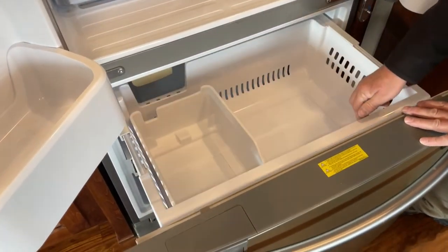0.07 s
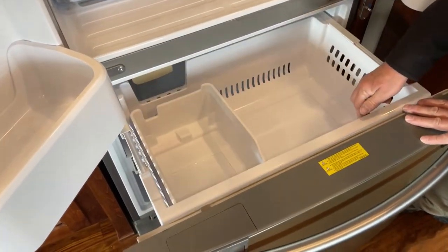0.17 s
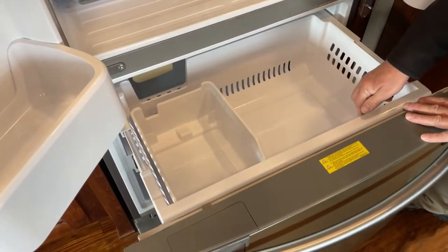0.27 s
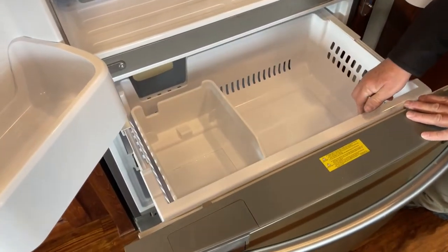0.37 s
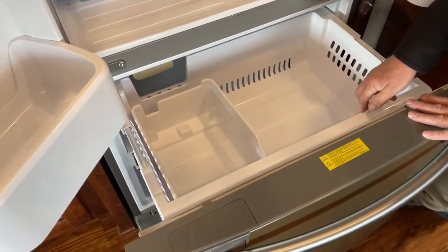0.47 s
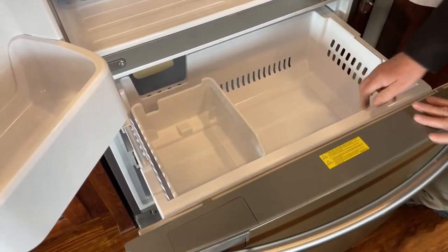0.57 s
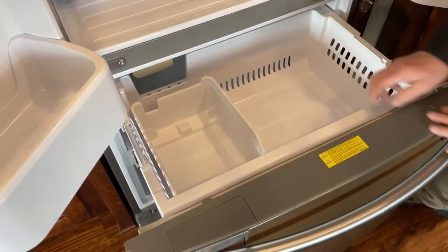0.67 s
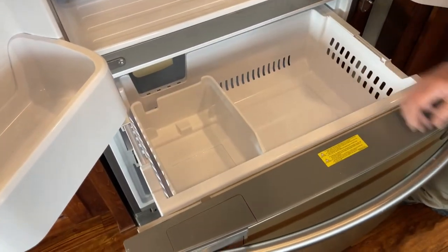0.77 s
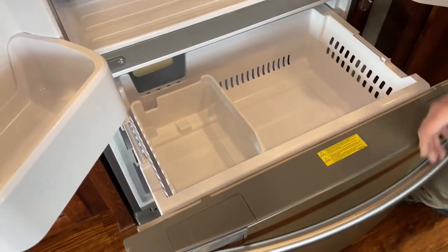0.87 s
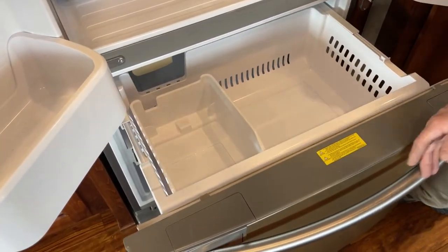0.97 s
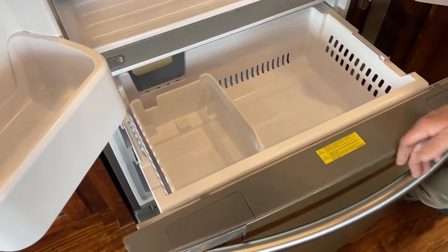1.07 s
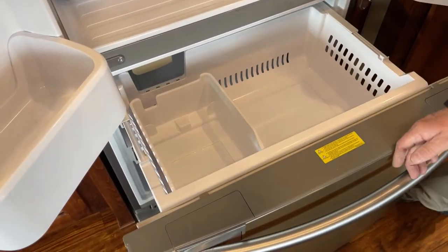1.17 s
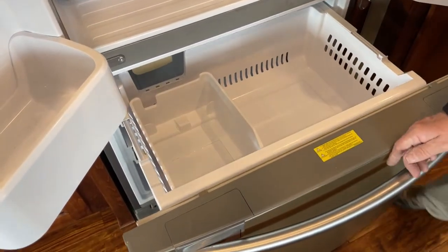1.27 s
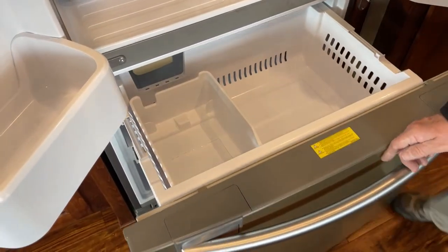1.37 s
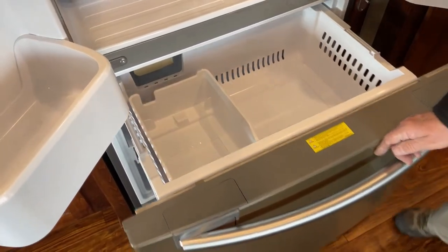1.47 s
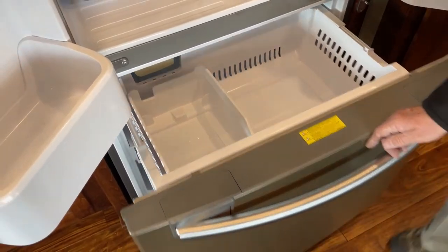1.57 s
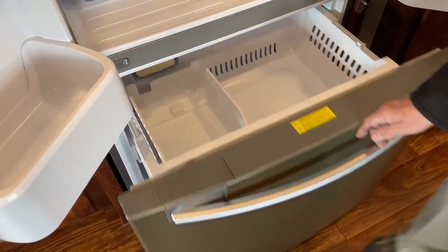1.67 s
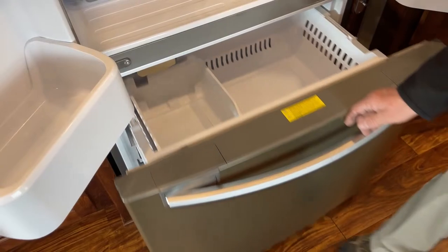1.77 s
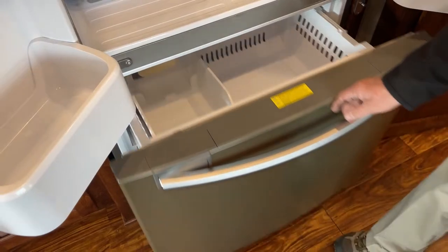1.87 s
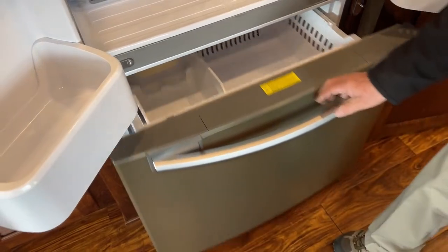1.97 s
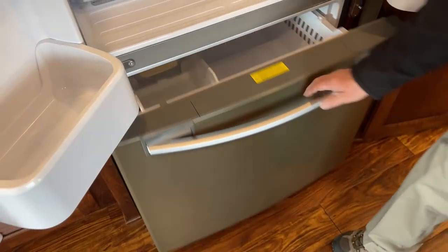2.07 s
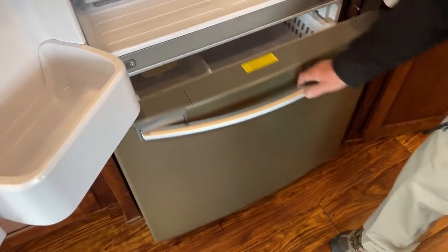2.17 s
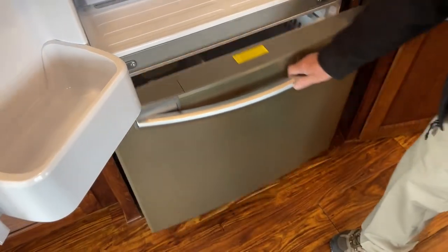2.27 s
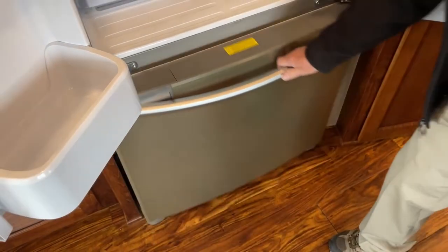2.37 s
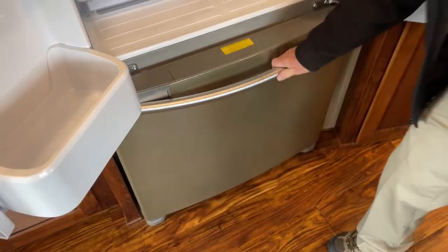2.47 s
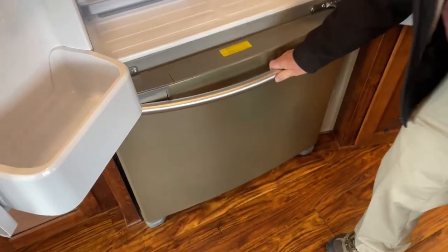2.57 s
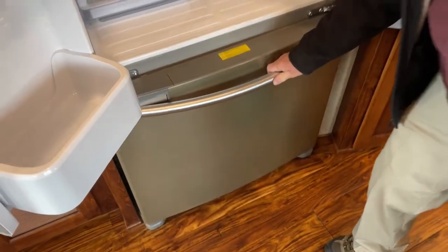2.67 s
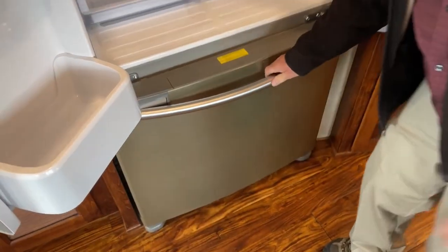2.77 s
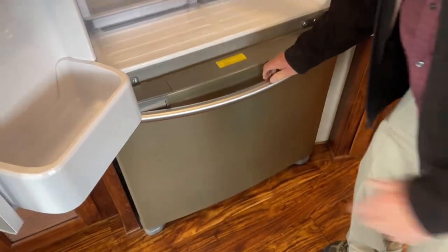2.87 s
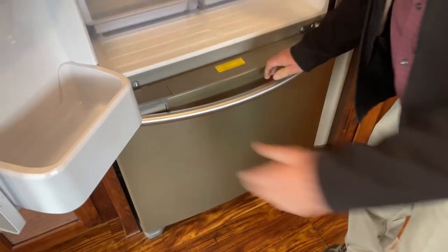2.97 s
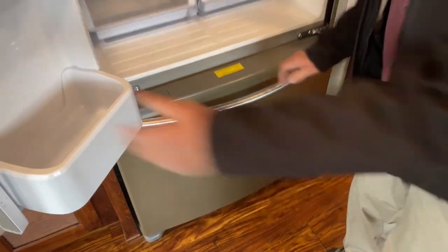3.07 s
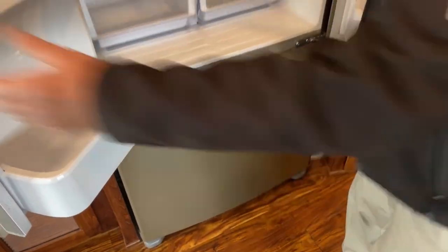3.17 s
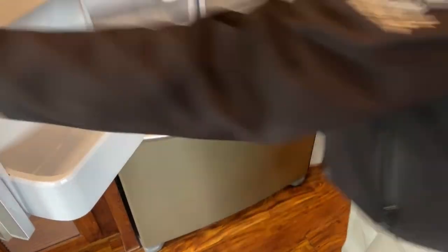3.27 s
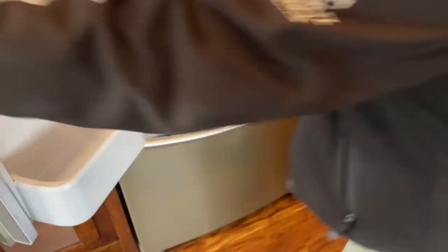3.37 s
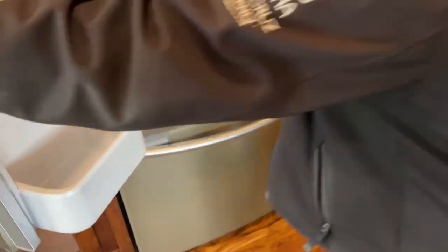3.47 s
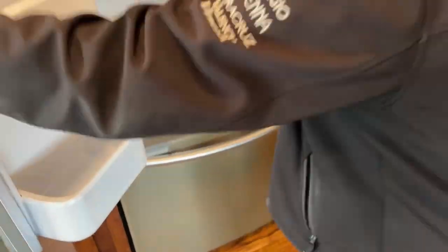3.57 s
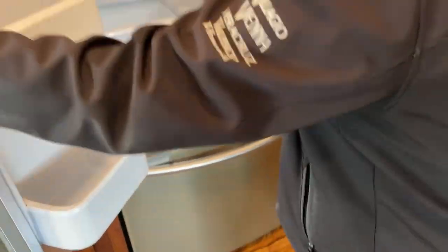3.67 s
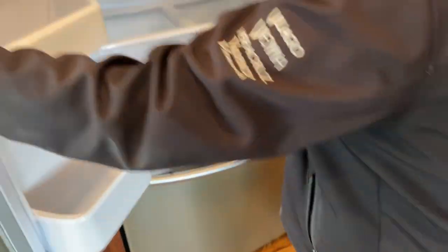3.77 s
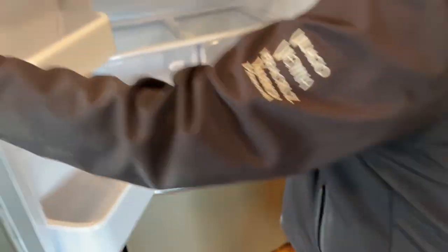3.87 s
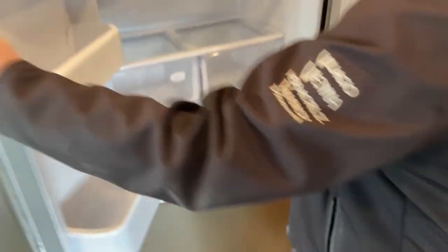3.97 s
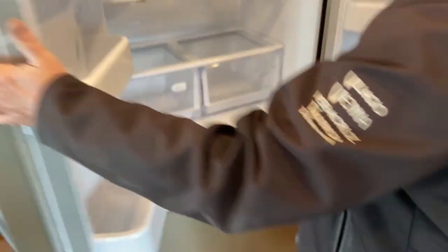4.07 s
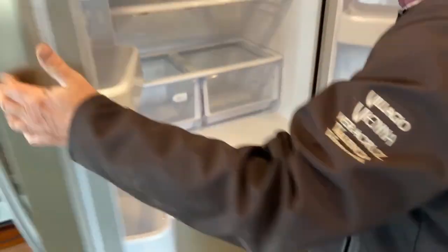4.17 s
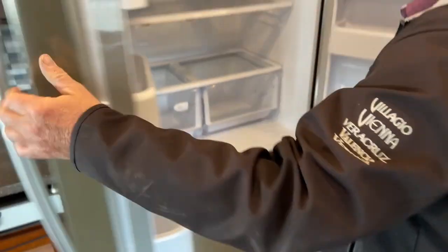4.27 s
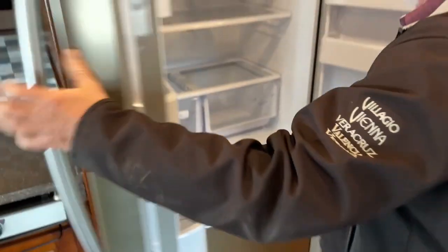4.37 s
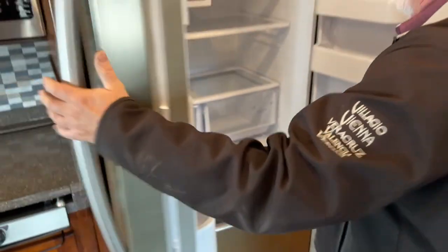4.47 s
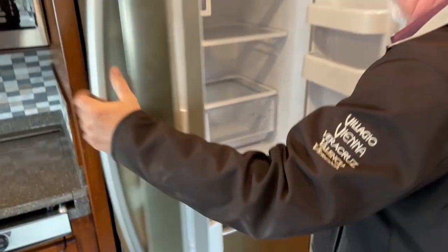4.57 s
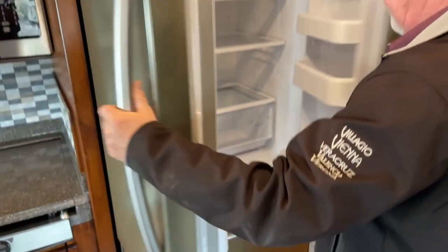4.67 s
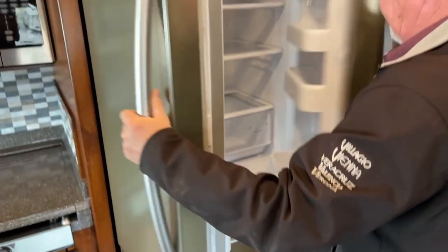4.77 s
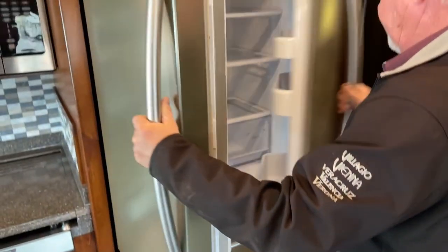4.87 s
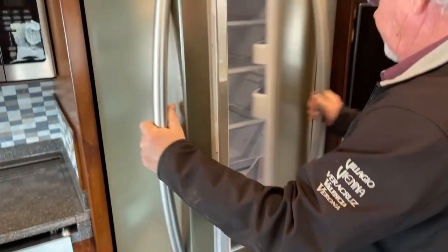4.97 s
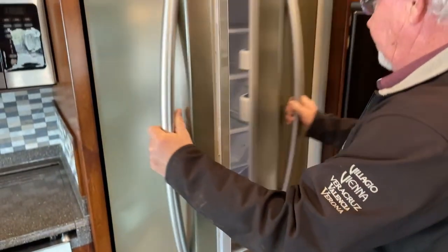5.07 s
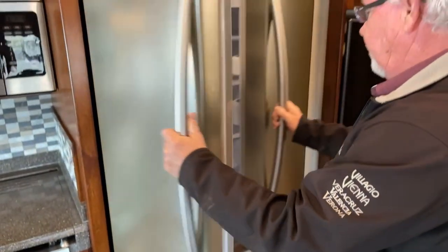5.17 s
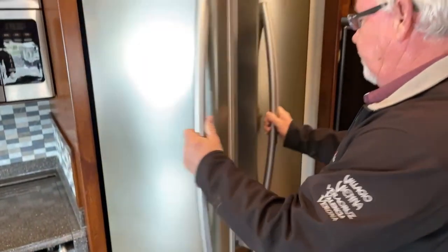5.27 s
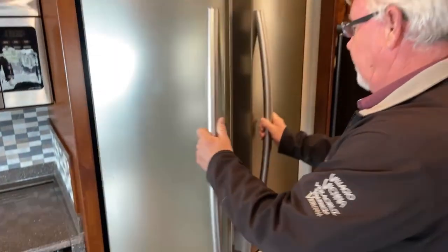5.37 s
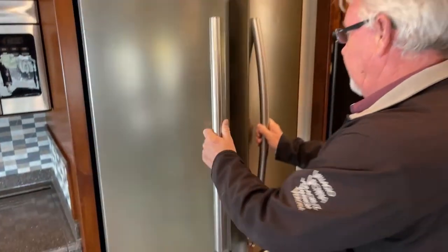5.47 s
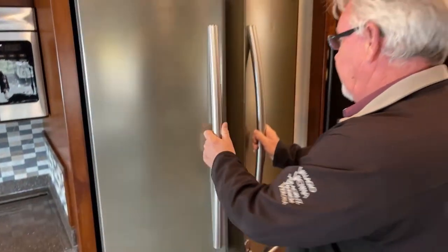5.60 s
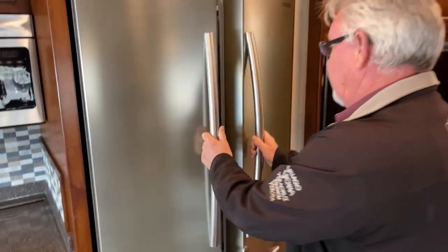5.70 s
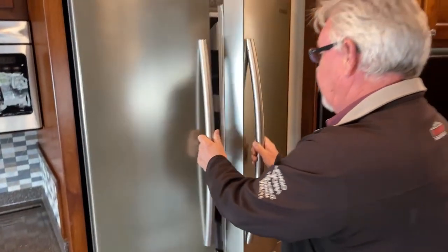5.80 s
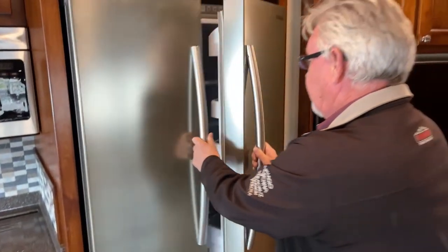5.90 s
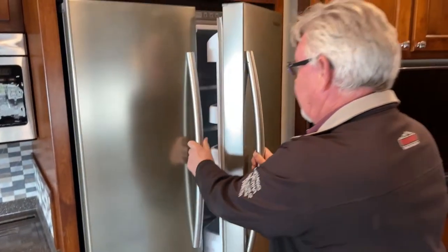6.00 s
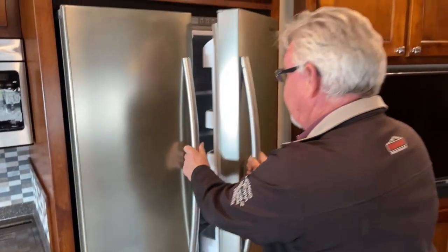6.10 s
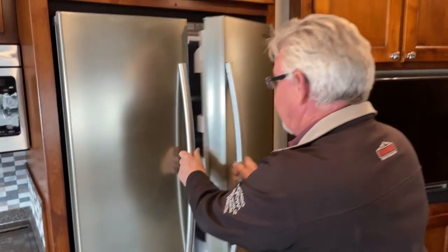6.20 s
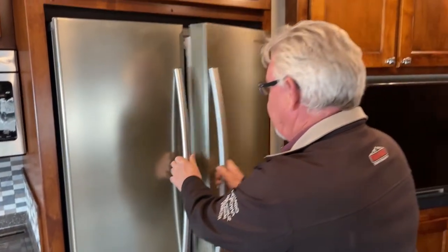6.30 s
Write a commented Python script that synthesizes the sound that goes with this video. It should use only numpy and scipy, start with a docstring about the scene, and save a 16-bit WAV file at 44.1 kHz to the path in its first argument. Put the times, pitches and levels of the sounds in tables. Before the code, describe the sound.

Inside a small, furnished cabin with a faint low drone, a hollow plastic knock rings off, then a freezer drawer scrapes along its rails and slams with two heavy, rattling thuds. A jacket sleeve swishes close by with tiny squeaks. Soft door thumps and handle clicks follow, ending with a double clack and deep thump of the refrigerator doors. Close microphone, short dull room.

```python
"""Refrigerator doors are swung and closed inside a motorhome, after a freezer drawer is rolled shut.
Blows ring the cabinet's panels as decaying modes and shake its trays and shelves as clumpy noise.
Seals and floor thump as sagging sines, hard parts snap and click, and the cabinet shudders on.
The drawer is noise through resonances of its box and rails; a sleeve sweeps past and squeaks.
Behind the close capsules' view lie a low drone, a changing hiss and murmur, and a short room."""
import sys
import numpy as np
from scipy import signal
from scipy.fft import rfft, irfft
from scipy.io import wavfile
from scipy.ndimage import uniform_filter1d

SR = 44100
rng = np.random.default_rng(int(sys.argv[2]) if len(sys.argv) > 2 else 0)


def dump(signal):
    """Clip the signal to [-1, 1] and save it as 16-bit WAV at the path in sys.argv[1]."""
    limited = np.clip(np.atleast_2d(signal).T, -1, 1)
    pcm = np.round(limited * 32767).astype(np.int16)
    wavfile.write(sys.argv[1], SR, pcm)


N = 279505

# Low drone of the cabin. Each row: frequency in Hz, relative level in dB per Hz.
CABIN_SPECTRUM = [(20, 0), (40, 0), (62, 0.5), (85, 5.5), (105, -1.5), (130, -5.5), (250, -33.5)]
CABIN_DB = -59.5

# Background hiss and dull murmur, changing over time; the hiss sinks after slams while the murmur swells.
# Each row: time in seconds, hiss level in dB, murmur level in dB.
BACKGROUND_LEVELS = [(0, -81, -74), (.3, -75, -62.5), (.55, -68.5, -64.5), (.72, -64.5, -65),
                     (1.2, -64, -64.5), (1.48, -69.5, -65.5), (2.05, -66.5, -51), (2.65, -71.5, -49),
                     (3.0, -66.5, -67.5), (3.4, -62, -62.5), (3.75, -67, -67), (4.0, -67.5, -61),
                     (4.24, -61, -61), (4.5, -67.5, -67), (4.8, -68.5, -69), (5.0, -65.5, -63.5),
                     (6.05, -62.5, -63.5), (6.16, -70, -61.5), (6.34, -60.5, -51)]
# Soft background hiss. Each row: frequency in Hz, relative level in dB per Hz.
HISS_SPECTRUM = [(800, 5), (2500, -1.5), (4000, -3), (7000, -6), (15500, -8)]
# Dull low-mid murmur. Each row: frequency in Hz, relative level in dB per Hz.
MURMUR_SPECTRUM = [(150, -1), (300, -6.5), (500, -8.5), (750, -9.5), (1100, -22), (2500, -31.5)]

# Weave of the sleeve sweeping past. Each row: frequency in Hz, relative level in dB per Hz.
WEAVE_SPECTRUM = [(300, 1), (650, 7.5), (1200, 4), (2100, 4), (2700, -3), (3600, 2), (6000, -7),
                  (15000, -24)]
# Squeaks of the sleeve. Each row: start in seconds, length in seconds, level in dB, climb time in seconds.
SQUEAKS = [(3.31, .052, -54, .011), (3.359, .068, -53, .027)]
SWEEP_S, SWEEP_DB = 3.341, -52  # height of the sweep
SWELL_DB_PER_S, EBB_DB_PER_S2 = 58, 1310
SQUEAK_LOW_HZ, SQUEAK_CEILING_HZ = 1070, 2190

# Tones of the drawer box. Each row: frequency in Hz, nominal width in Hz, relative level in dB.
BOX_TONES = [(277, 32, 8), (397, 61, 5), (513, 62, 0), (738, 34, 5)]
# Rough stretch that swells the lower box tones. Each row: time in seconds, added level in dB.
ROUGH_STRETCH = [(1.52, -0.5), (1.92, 4.5), (1.945, 8.5), (2.025, 8), (2.05, -2)]
# Tones of the steel rails. Each row: frequency at full speed in Hz, nominal width in Hz, relative level in dB.
RAIL_TONES = [(1780, 190, 1), (2440, 130, 7.5), (3210, 300, 13), (4930, 630, -1), (5300, 280, -7)]
# Broad scrape of the rails. Each row: frequency in Hz, relative level in dB per Hz.
SCRAPE_SPECTRUM = [(1500, 2), (3300, 0), (3900, -8), (4500, 3), (5700, 0), (6000, -28)]
SLIDE_S, STOP_S = 1.522, 2.11
JERK_DB, JERK_S = 6.5, 0.019  # extra level as the drawer breaks loose, and its decay constant
BOX_DB, WALL_HZ = -56, 650  # box tones above WALL_HZ stay even on the rough stretch
RAILS_DB, SCRAPE_DB = -64.5, -1  # the scrape is set against the song of the rails
STIFF_HZ = 4000  # rail tones above this neither follow the speed nor fade early
LOW_RAILS_DB_PER_S = -42  # fade of the lower rail tones against the stiff ones
HUSH_S, HUSH_DB_PER_S = 1.78, -72  # from here on song and scrape fade together

# Tiny bright ticks. Each row: start in seconds, level in dB, frequency in Hz.
TICKS = [(1.518, -40.5, 2150), (2.0499, -41, 13000), (3.818, -47, 9170), (5.0625, -41, 12300)]
# Dry finger clicks on handles and trim. Each row: start in seconds, level before decay in dB, frequency in Hz.
CLICKS = [(1.1975, -31, 620), (2.907, -41, 686), (3.1336, -34, 727), (5.156, -33, 830)]
# Hard parts snapping together. Each row: start in seconds, level before decay in dB.
SNAPS = [(2.471, -26.5), (5.865, -33.5), (5.9428, -23)]
# Sharp colour of a snap. Each row: frequency in Hz, relative level in dB per Hz.
SNAP_SPECTRUM = [(500, 17.5), (3000, -6.0), (10000, -2.5), (15500, -4)]

# Deep thumps of seals and floor. Each row: time in seconds, level in dB, settled pitch in Hz, t60 in seconds.
THUMPS = [(0.056, -37, 69, 0.45), (2.101, -31, 96.8, 0.28), (2.34, -37, 83, 0.46),
          (2.474, -10, 73.5, 0.088), (2.499, -18.5, 46, 0.26), (2.52, -12, 29.3, 0.057),
          (2.62, -36, 74, 0.39), (3.16, -44, 88, 0.37), (3.578, -37.5, 91.3, 0.19),
          (3.649, -43.5, 92.7, 0.34), (3.958, -25.5, 95, 0.2), (4.055, -32.5, 97.6, 0.21),
          (4.446, -39.5, 87.5, 0.22), (5.87, -26, 76, 0.12), (5.927, -28.5, 99.5, 0.38),
          (5.973, -15.5, 56.7, 0.28)]

# Cabinet shuddering on after the big slams. Each row: start in seconds, level in dB, t60 in seconds.
SHUDDERS = [(0.0, -32.5, 0.4), (2.498, -32, 0.4), (5.97, -35.5, 0.32)]
SHUDDER_WIDTH_HZ = 25.5  # of each panel while the cabinet shudders

# Modes of panels and trays. Each row: nominal frequency in Hz, relative level in dB.
PANELS = [(135, 15.5), (183, 10.5), (226, 5.5), (268, 2.5), (323, -3.5), (360, -1), (430, -7), (506, -0.5),
          (592, -2.5), (646, -9), (700, 1), (759, -3), (870, -10.5)]
# Body of the rattling trays. Each row: frequency in Hz, relative level in dB per Hz.
TRAY_SPECTRUM = [(300, 9.5), (700, 8), (1000, -0.5), (1290, -2), (1950, -7.5), (2300, -27.5)]
# Body of the rattling door shelves. Each row: frequency in Hz, relative level in dB per Hz.
SHELF_SPECTRUM = [(400, 11), (1050, 1), (1550, 6.5), (1950, 1), (2600, -25)]
# Treble of either rattle. Each row: frequency in Hz, relative level in dB per Hz.
TREBLE_SPECTRUM = [(2300, 4.5), (2830, 4), (3200, 2), (3580, 1), (4200, -5.5), (9000, -13.5),
                   (15500, -18.5)]
# Blows on the cabinet. Each row: time in seconds, ring level in dB, centre of the struck modes in Hz,
# ring t60 at 450 Hz in seconds, rattle level in dB, hardness from 0 to 1.
BLOWS = [(0.005, -16, 493, 0.08, -26, 0), (0.02, -22, 450, 0.19, -29.5, 0.43),
         (0.042, -19.5, 266, 0.099, -40, 1), (0.091, -24, 207, 0.092, -46.5, 0.55),
         (0.235, -38, 535, 0.077, -50, 0.6), (0.414, -45, 236, 0.077, -53.5, 0.87),
         (1.451, -51, 400, 0.13, -67, 0), (1.519, -40, 259, 0.048, -53.5, 0),
         (1.854, -43, 320, 0.21, -51, 0.73), (2.013, -44, 460, 0.065, -47.5, 0.66),
         (2.108, -19.5, 340, 0.1, -37, 0.45), (2.119, -10.5, 283.5, 0.065, -35.5, 0.79),
         (2.2, -18.5, 794, 0.075, -28.5, 0.34), (2.329, -35.5, 460, 0.17, -42, 0.35),
         (2.344, -29, 450, 0.087, -38, 1), (2.393, -33.5, 586, 0.2, -39.5, 0.5),
         (2.468, -19, 497, 0.041, -41, 1), (2.473, -10.5, 720, 0.089, -22.5, 0.53),
         (2.504, -20, 600, 0.13, -32, 0.68), (2.53, -18.5, 197, 0.1, -32, 0.5),
         (3.559, -48, 350, 0.12, -59, 0.1), (3.583, -36, 354, 0.058, -46.5, 0.7),
         (3.62, -39.5, 613, 0.044, -40.5, 0.76), (3.733, -39.5, 380, 0.069, -45, 0.42),
         (3.914, -49, 363, 0.12, -52, 0.2), (3.95, -22.5, 337, 0.075, -46, 0.26),
         (3.983, -27.5, 358, 0.024, -46.5, 0.32), (4.033, -41, 340, 0.048, -54, 0.2),
         (4.046, -33, 370, 0.08, -64, 0.4), (4.256, -41.5, 336, 0.069, -57, 0.44),
         (4.584, -54, 413, 0.051, -46, 0.71), (4.959, -69, 494, 0.064, -50.5, 0.78),
         (5.073, -53.5, 476, 0.19, -57, 0.2), (5.631, -55, 493, 0.51, -57, 0.35),
         (5.867, -26, 310, 0.089, -34.5, 0.54), (5.904, -36, 356, 0.16, -39, 0.83),
         (5.93, -39, 500, 0.095, -42, 0.9), (5.942, -43, 630, 0.054, -32, 0.7),
         (5.953, -25.5, 394, 0.044, -40.5, 0.55), (5.966, -26, 604, 0.023, -34, 0.75),
         (6.055, -38.5, 500, 0.066, -71, 0.3), (6.106, -31.5, 453, 0.017, -69, 0.5),
         (6.184, -46.5, 690, 0.078, -58.5, 0)]
DOORS_S = 5.8  # after this the door shelves rattle instead of the trays
NARROW_DB = 60  # lost by a mode one octave from the contact's pitch
PEAK_TURNS = 1.39  # cycles of the contact's pitch around which the ring builds up
LUMPY_DB = 4.8  # rms unevenness of the rattle
SOFT_TREBLE_DB, HARD_TREBLE_DB = -27, -5.5  # rattle treble against its body, softest and hardest blow
CRACK_DB, CRACK_S = 0, 0.0047  # extra treble at the start of each rattle, and its decay constant

# Tails of the room. Each row: frequency in Hz, t60 in seconds.
ROOM_T60 = [(100, 0.71), (700, 0.28), (4000, 0.25), (12000, 0.14)]
# Balance of the capsules. Each row: frequency in Hz, left minus right in dB.
LEFT_RIGHT = [(100, 1.13), (700, 1.12), (2000, 0.47), (6000, 0.18)]
# Diffuse sound of opposite sign at the two capsules. Each row: frequency in Hz, gain in dB.
DIFFUSE_GAIN = [(100, -42), (1000, -56)]
EDGE_HZ = 15800


def amp(db):
    """Decibels to gain."""
    return 10 ** (np.asarray(db) / 20)


def unit(x):
    """Scales to rms 1."""
    return x / np.sqrt(np.mean(x ** 2) + 1e-20)


def read(points, hz):
    """Reads a table on a log-frequency axis."""
    f, value = np.transpose(points)
    return np.interp(np.log(hz + 1), np.log(f + 1), value)


def follow(rows):
    """Columns of a curve at every sample."""
    s, *columns = np.transpose(rows)
    return [np.interp(np.arange(N) / SR, s, c) for c in columns]


def add(mix, s, sound):
    """Mixes a sound in at time s."""
    part = mix[max(round(s * SR), 0):][:len(sound)]
    part += sound[:len(part)]


def coloured(x, points):
    """Gives x the spectrum of a table at rms 1, falling 24 dB per octave outside it."""
    hz = np.fft.rfftfreq(len(x), 1 / SR)
    octaves_below = np.maximum(np.log2(points[0][0] / (hz + 1)), 0)
    octaves_above = np.maximum(np.log2((hz + 1) / points[-1][0]), 0)
    gain = amp(read(points, hz) - 24 * (octaves_below + octaves_above))
    return unit(irfft(rfft(x) * gain, len(x)))


def resonate(x, hz, width):
    """A resonance of gain 1 that follows the curve hz: shift down, smooth, shift back up."""
    turn = np.exp(2j * np.pi * np.cumsum(hz * np.ones(len(x))) / SR)
    r = np.exp(-np.pi * width / SR)
    return 2 * (turn * signal.lfilter([1 - r], [1, -r], x / turn)).real


def grainy(flutter_db, size, length=N):
    """Noise whose level flutters at random; size is the smoothing of the flutter in samples."""
    flutter = unit(uniform_filter1d(rng.standard_normal(length), size=size))
    return rng.standard_normal(length) * amp(flutter_db * flutter)


def cabin():
    """Low wavering drone: slowly fluttering noise confined to the bass."""
    return amp(CABIN_DB) * coloured(grainy(2.5, size=3000), CABIN_SPECTRUM)


def hiss_and_murmur():
    """Soft hiss and a dull low-mid murmur that swells after the slams, both fluttering noise."""
    hiss_db, murmur_db = follow(BACKGROUND_LEVELS)
    hiss = amp(hiss_db) * coloured(grainy(1.0, size=300), HISS_SPECTRUM)
    murmur = amp(murmur_db) * coloured(grainy(2.3, size=600), MURMUR_SPECTRUM)
    return hiss + murmur


def squeak(length, db, climb_s):
    """A fuzzy whistle of the weave that climbs to a ceiling as a fold slips faster."""
    t = np.arange(0, length, 1 / SR)
    hz = SQUEAK_CEILING_HZ - (SQUEAK_CEILING_HZ - SQUEAK_LOW_HZ) * np.exp(-t / climb_s)
    fuzz = unit(resonate(rng.standard_normal(len(t)), hz, 160))
    tone = np.sin(2 * np.pi * np.cumsum(hz) / SR) + 0.35 * fuzz
    return amp(db) * np.sin(np.pi * t / length) ** .5 * tone


def sleeve():
    """Cloth on cloth: a broad swish that swells and ebbs, with short squeaks around its height."""
    t = np.arange(N) / SR
    swell_db = -SWELL_DB_PER_S * np.maximum(SWEEP_S - t, 0)
    ebb_db = -EBB_DB_PER_S2 * np.maximum(t - SWEEP_S, 0) ** 2
    out = amp(SWEEP_DB + swell_db + ebb_db) * coloured(grainy(1.4, size=120), WEAVE_SPECTRUM)
    for s, *row in SQUEAKS:
        add(out, s, squeak(*row))
    return out


def drawer():
    """Rolling roughness drives the box and the steel rails, whose song climbs as the drawer gathers speed."""
    t = np.arange(N) / SR
    moving = uniform_filter1d(((t >= SLIDE_S) & (t <= STOP_S)) * 1., size=200)
    since = np.clip(t - SLIDE_S, 0, STOP_S - SLIDE_S)
    jerk_db = JERK_DB * np.exp(-since / JERK_S)
    hush_db = HUSH_DB_PER_S * np.maximum(t - HUSH_S, 0)
    speed = 1 - 0.08 * np.exp(-since / 0.03)  # relative to full speed
    rough_db = follow(ROUGH_STRETCH)[0]

    roughness = grainy(2.0, size=500)
    box = np.zeros(N)
    for hz, width, db in BOX_TONES:
        tone = resonate(resonate(roughness, hz, 2.0 * width), hz, 3 * width)
        box += amp(db + rough_db * (hz < WALL_HZ)) / np.sqrt(width) * tone

    roughness = grainy(1.3, size=200)
    song = np.zeros(N)
    for hz, width, db in RAIL_TONES:
        loose = hz < STIFF_HZ
        pitch = hz * speed ** loose
        tone = resonate(resonate(roughness, pitch, 0.7 * width), pitch, 3 * width)
        song += amp(db + LOW_RAILS_DB_PER_S * since * loose) / np.sqrt(width) * tone

    scrape = amp(SCRAPE_DB) * coloured(grainy(1, size=200), SCRAPE_SPECTRUM)
    rails = amp(RAILS_DB + jerk_db + hush_db) * (unit(song) + scrape)
    return moving * (amp(BOX_DB + jerk_db) * unit(box) + rails)


def tick(db, hz):
    """Five cycles of a very small hard part, fullest early on."""
    cycles = np.arange(0, 5, hz / SR)
    return amp(db) * np.sin(2 * np.pi * cycles) * np.sin(np.pi * (cycles / cycles[-1]) ** .5) ** 2


def click(db, hz):
    """A single quick push with hardly any ring."""
    cycles = np.arange(SR // 50) / SR * hz
    return -amp(db) * np.sin(2 * np.pi * cycles) * np.exp(-2.2 * cycles)


def snap(db):
    """Hard parts meet: a burst of broad noise that dies within milliseconds."""
    t = np.arange(SR // 20) / SR
    return amp(db) * np.exp(-t / 0.0017) * coloured(rng.standard_normal(len(t)), SNAP_SPECTRUM)


def thump(db, hz, t60):
    """Air squeezed by a seal pushes the cabin once; it swings out, sagging slightly in pitch."""
    t = np.arange(SR) / SR
    turns = hz * (t + 0.0029 * (1 - np.exp(-t / 0.072)))
    rise = 1 - np.exp(-(t * hz / 0.44) ** 2)  # builds up within a cycle
    fall = amp(db - 60 * (t / t60) ** 1.314)  # the soft seal damps it ever faster
    return fall * rise * np.sin(2 * np.pi * turns)


def shudder():
    """After each big slam the panels keep humming, stirred by a dull noise."""
    level, t = np.zeros(N), np.arange(SR) / SR
    for s, db, t60 in SHUDDERS:
        add(level, s, amp(db - 60 * t / t60) * (1 - np.exp(-t / 0.0011)))
    stir = grainy(1.3, size=600)
    hum = sum(amp(db) * resonate(stir, hz, SHUDDER_WIDTH_HZ) for hz, db in PANELS)
    return level * unit(hum)


def panel_ring(t, centre_hz, t60):
    """Panel modes near the contact's pitch ring, almost in step at the height of the contact."""
    hz, db = np.transpose(PANELS)[:, :, None]
    near_db = db - NARROW_DB * np.log2(hz / centre_hz) ** 2  # far modes are barely stirred
    detune, lag = rng.uniform(-1.16, 1, (2, len(PANELS), 1))
    mode_t60 = t60 * (450 / hz) ** 0.32  # low panels ring longer
    phase = 2 * np.pi * hz * (1 + 0.028 * detune) * (t - PEAK_TURNS / centre_hz) + 0.96 * lag
    modes = amp(near_db - 60 * t / mode_t60) * np.cos(phase)
    rise = 1 - np.exp(-(t * centre_hz / PEAK_TURNS) ** 2)
    return modes.sum(0) * rise / np.linalg.norm(amp(near_db))


def loose_rattle(t, body_spectrum, t60, hard):
    """Loose parts knock in quick clumps; a harder blow brings out their treble."""
    body = coloured(grainy(LUMPY_DB, 130, len(t)), body_spectrum)
    treble = coloured(grainy(LUMPY_DB, 130, len(t)), TREBLE_SPECTRUM)
    treble_db = SOFT_TREBLE_DB + (HARD_TREBLE_DB - SOFT_TREBLE_DB) * hard
    crack = 1 + amp(CRACK_DB) * np.exp(-t / CRACK_S)
    shake = amp(-60 * (t / (1.405 * t60)) ** 1.387) * (1 - np.exp(-t / 0.00058))
    return shake * (body + amp(treble_db) * treble * crack)


def blow(body_spectrum, ring_db, centre_hz, t60, rattle_db, hard):
    """Panels near the struck place ring; loose parts rattle on for a moment."""
    t = np.arange(SR // 2) / SR
    ring = amp(ring_db) * panel_ring(t, centre_hz, t60)
    return ring + amp(rattle_db) * loose_rattle(t, body_spectrum, t60, hard)


def cabinet():
    """All blows, snaps, clicks and ticks as one signal, the deep thumps as another."""
    knocks, deep = np.zeros((2, N))
    for s, *row in BLOWS:
        body_spectrum = SHELF_SPECTRUM if s > DOORS_S else TRAY_SPECTRUM
        add(knocks, s - .001, blow(body_spectrum, *row))  # starts just ahead of its time
    for rows, sound in ((SNAPS, snap), (CLICKS, click), (TICKS, tick)):
        for s, *row in rows:
            add(knocks, s, sound(*row))
    for s, *row in THUMPS:
        add(deep, s - .003, thump(*row))
    return knocks, deep


def room(x):
    """Noise tails, each band dying at its own speed; one shared, one for the left-right difference."""
    taps = rng.standard_normal((2, SR // 2)) * (np.arange(SR // 2) > 200)  # silent for the first 200 samples
    hz, t, bands = signal.stft(taps, SR, nperseg=256)
    decay = amp(-60 * t / read(ROOM_T60, hz)[:, None])
    tail = signal.istft(bands * decay, SR, nperseg=256)[1]
    return signal.fftconvolve(x[None], tail / np.linalg.norm(tail[0]), axes=1)[:, :N]


def scene():
    """Close capsules hear nearly the same sound, the left a little louder."""
    knocks, deep = cabinet()
    near = knocks + drawer() + sleeve()
    wet, wide = room(near)
    mid = near + amp(-10.0) * wet + deep + shudder() + hiss_and_murmur() + cabin()
    hz = np.fft.rfftfreq(N, 1 / SR)
    around = hiss_and_murmur() + cabin() + wide  # fresh background, plus the room's tail of the near sounds
    diffuse = irfft(rfft(around) * amp(read(DIFFUSE_GAIN, hz)), N)
    lean = amp(read(LEFT_RIGHT, hz) / 2)
    left = irfft(rfft(mid) * lean, N) + diffuse
    right = irfft(rfft(mid) / lean, N) - diffuse
    return np.array([left, right])


def record(dry):
    """Band limit of the microphone channel: a steep low-pass at EDGE_HZ."""
    low_pass = signal.firwin(511, EDGE_HZ, window=("kaiser", 9), fs=SR)
    return signal.oaconvolve(dry, low_pass[None], "same")


dry = scene()
out = record(dry)
dump(out)
```